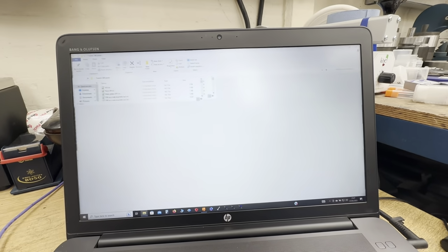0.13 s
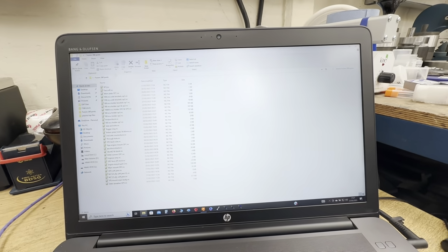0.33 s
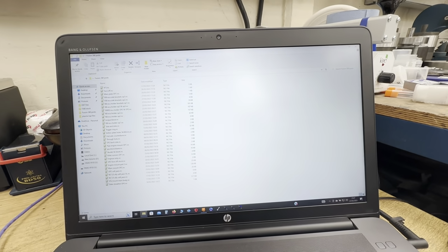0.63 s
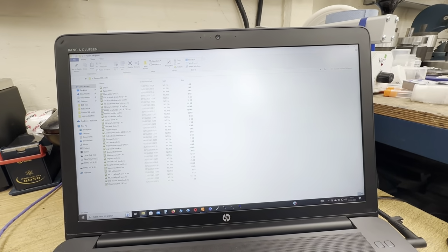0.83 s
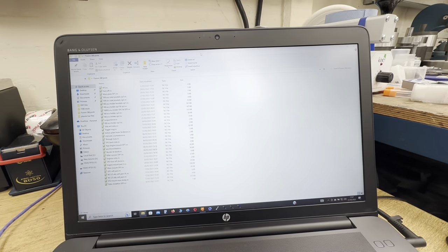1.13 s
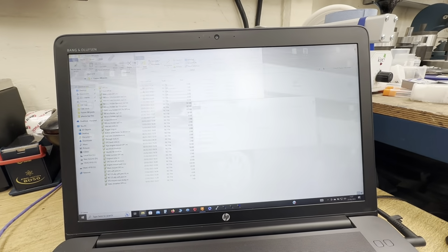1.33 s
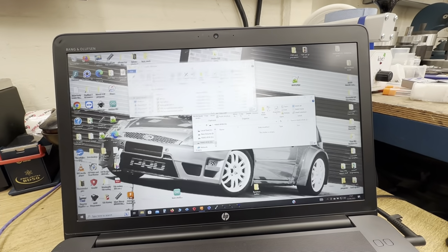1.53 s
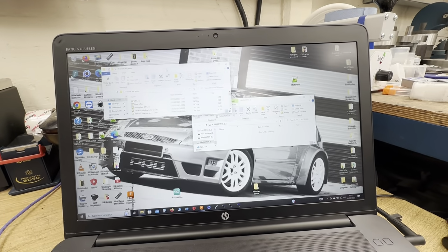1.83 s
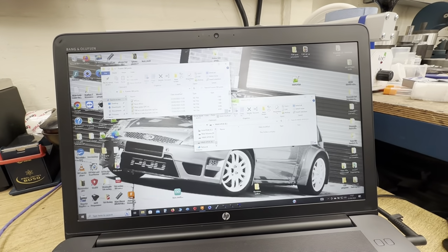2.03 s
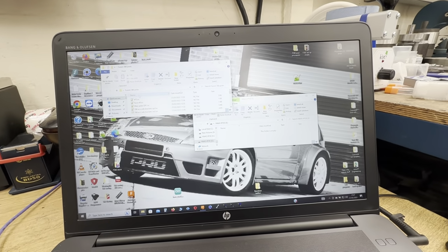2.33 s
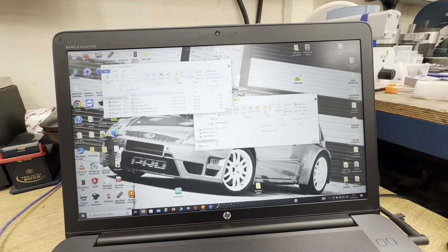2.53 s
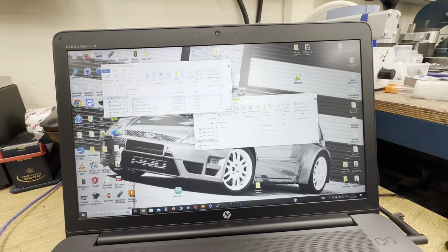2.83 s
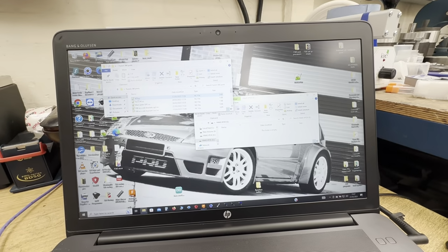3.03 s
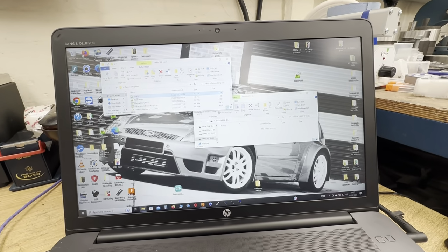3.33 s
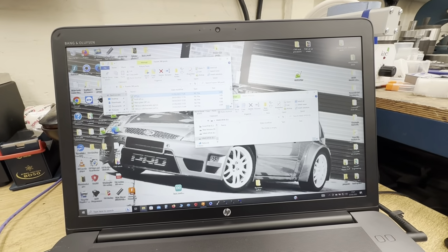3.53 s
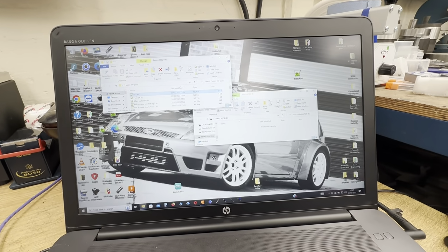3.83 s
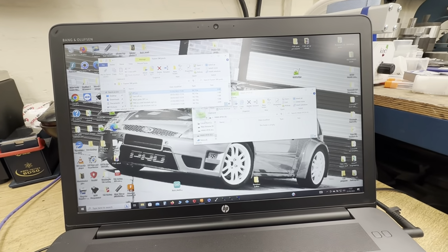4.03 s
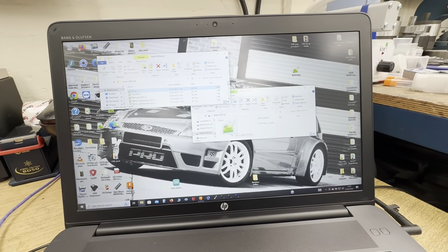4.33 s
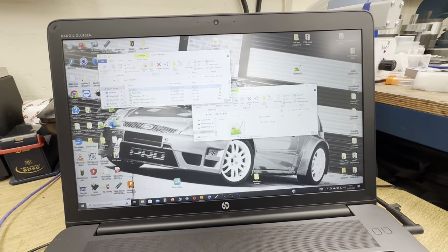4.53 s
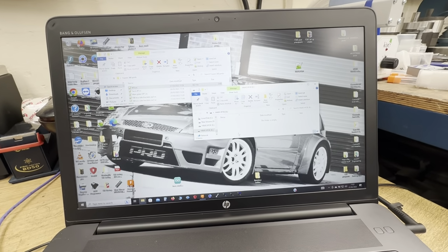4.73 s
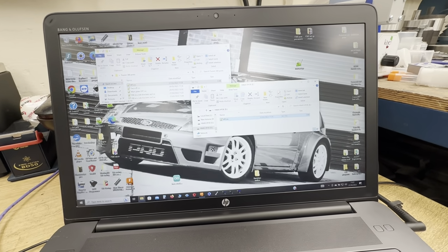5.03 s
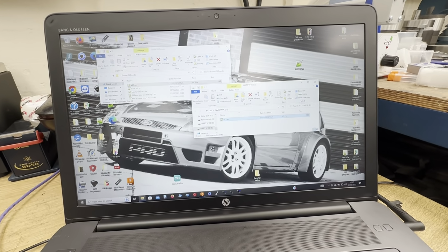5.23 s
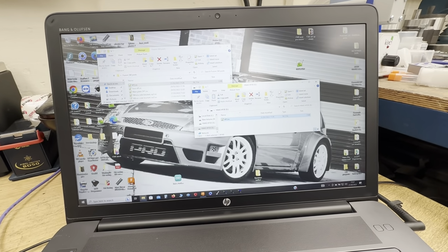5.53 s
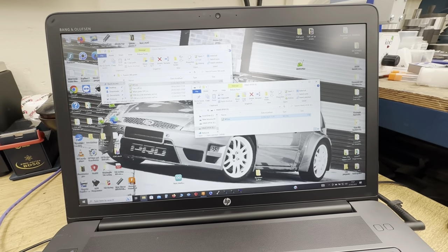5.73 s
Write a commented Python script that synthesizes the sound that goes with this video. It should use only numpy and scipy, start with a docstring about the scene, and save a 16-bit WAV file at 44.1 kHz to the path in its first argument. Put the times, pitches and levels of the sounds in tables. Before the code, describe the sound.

Steady machine drone with low hum, rushing air and a buzzing treble whine, dotted with a few crisp mouse clicks near the right side.

```python
"""Compressor in a workshop

An air compressor runs steadily, mostly to the left: sines for shaft hum, rotor tones and a whine full of
sidebands, a looped buzz for the casing, shaped noise for rumble, rushing air and fizz. A cooling fan and mains
gear add sine drones. A mouse clicks close by on the right, as short rings, snaps and taps. The hand-held
two-port microphone sways by a few centimetres, which bends the steady tones and the buzz."""
import sys
import numpy as np
from scipy import signal
from scipy.fft import rfft, irfft, next_fast_len
from scipy.io import wavfile
from scipy.ndimage import uniform_filter1d, map_coordinates

SR = 44100
rng = np.random.default_rng(int(sys.argv[2]) if len(sys.argv) > 2 else 0)


def int16_out(signal):
    """Quantize to a 16-bit WAV file."""
    q = np.round(np.clip(np.atleast_2d(signal).T, -1, 1) * 32767)
    wavfile.write(sys.argv[1], SR, q.astype(np.int16))


N = 260190
T = np.arange(N) / SR

SHAFT_HZ, ROTOR_HZ, FAN_HZ, MAINS_HZ, WHINE_HZ = 31.515, 105.103, 249.0, 50.0, 3798.18
MONO_HZ = 10300  # above this the casing buzz has one pattern for both ports and the room ripple stops
TOP_HZ = 15850


def amp(db):
    """Gain of a level in dB."""
    return 10 ** (np.asarray(db) / 20)


def along(points, hz, column=1):
    """One column of a table that starts with Hz, read on a log frequency axis."""
    rows = np.array(points)
    return np.interp(np.log(hz + 1), np.log(rows[:, 0] + 1), rows[:, column])


def wobble(rate):
    """A smooth random curve with rate knots a second."""
    knots = rng.standard_normal(int(N * rate / SR) + 4)
    coarse_t = T[::64]
    return np.interp(T, coarse_t, map_coordinates(knots, [coarse_t * rate]))


def filtered(x, response):
    """Shapes x by a complex response of frequency."""
    size = next_fast_len(N + 8192)
    hz = np.fft.rfftfreq(size, 1 / SR)
    return irfft(rfft(x, size) * response(hz), size)[..., :N]


def bump(hz, centre, width):
    """A bell of height 1 on the frequency axis."""
    return np.exp(-((hz - centre) / width) ** 2)


# Microphone sway, as extra travel time of the sound: time_s [s], delay_ms [ms]
SWAY_PATH = [(0.0, -0.15), (1.0, -0.03), (2.9, 0.095), (4.3, -0.01), (4.9, 0.0), (5.9, -0.09)]


def swayed_time():
    """The time at which sound now arriving left its source, so the sway bends pitch slightly."""
    delay_ms = np.interp(T, *np.transpose(SWAY_PATH))
    return T - delay_ms / 1000


def tone(hz, left_db, right_db, left_lag_rad):
    """A sine of chance phase; standing waves give each port its own level and phase."""
    phase = 2 * np.pi * hz * swayed_time() + rng.uniform(0, 2 * np.pi)
    left = amp(left_db) * np.cos(phase)
    right = amp(right_db) * np.cos(phase + left_lag_rad)
    return np.sqrt(2) * np.array([left, right])  # levels are RMS


def tones(rows, waver_db, rate):
    """Sums sines that each waver in level on their own."""
    return sum(amp(waver_db * wobble(rate)) * tone(*row) for row in rows)


def multiples(base_hz, table):
    """Turns a first column of multiples into Hz."""
    return [(k * base_hz, *rest) for k, *rest in table]


# Low shaft hum: multiple [of SHAFT_HZ], left_db [dB], right_db [dB], left_lag_rad [rad], loudest_s [s]
HUM_TONES = [(3, -36.7, -37.7, .2, .7), (4, -37.3, -39.3, .5, 1.3)]


def hum():
    """Low shaft multiples, each slowly waxing and waning in level."""
    swing_db, period_s = 1.1, 2.21
    out = np.zeros((2, N))
    for k, left_db, right_db, left_lag_rad, loudest_s in HUM_TONES:
        swing = amp(swing_db * np.cos(2 * np.pi * (T - loudest_s) / period_s))
        out += swing * tone(k * SHAFT_HZ, left_db, right_db, left_lag_rad)
    return out


# Whine, pulsed by the shaft; the centre tone (overtone 1, sideband 0) is set in whine() instead:
# overtone [of WHINE_HZ], sideband [steps of SHAFT_HZ], left_db [dB], right_db [dB], left_lag_rad [rad]
WHINE_SIDES = [(1, -2, -53, -63, 0.6), (1, -1, -55, -61, 2.0), (1, 0, -52, -46, -0.4),
               (1, 1, -61, -60, 2.4), (1, 2, -60, -59, 2.6), (1, 3, -57, -61, -0.4), (1, 6, -61, -73, 0.6),
               (3, -1, -74, -73, -0.0)]


def whine():
    """A centre tone that grows and spreads to the left, among slowly wavering shaft sidebands."""
    grow_s = 2.5  # time constant

    def grown(start_db, settled_db):
        return settled_db + (start_db - settled_db) * np.exp(-T / grow_s)

    centre = tone(WHINE_HZ, grown(-68, -47), grown(-51, -44.5), -.4)
    sides = [(m * WHINE_HZ + k * SHAFT_HZ, *rest) for m, k, *rest in WHINE_SIDES if k]
    return centre + tones(sides, waver_db=2.0, rate=1.2)


# Rotor tones: multiple [of ROTOR_HZ], left_db [dB], right_db [dB], left_lag_rad [rad]
ROTOR_TONES = [(1, -48, -50, .3), (10, -49, -63, 2.3), (15, -44, -62, 1.5), (20, -47, -58, -1.7),
               (25, -63, -63, -.3)]


def rotor():
    """Multiples of the rotor speed, each swelling and fading by chance."""
    return tones(multiples(ROTOR_HZ, ROTOR_TONES), waver_db=2.3, rate=1.885)


# Strongest high shaft tones: multiple [of SHAFT_HZ], left_db [dB], right_db [dB], left_lag_rad [rad]
SHAFT_TONES = [(116, -58, -70, 3.0), (117, -59, -64, 2.6), (119, -52, -54, 1.3), (120, -41, -65, 1.3),
               (123, -50, -62, -2.5), (239, -54, -62, -0.2), (243, -60, -70, 0.2), (244, -54, -66, 0.6),
               (245, -57, -69, -0.9), (246, -58, -64, -2.5), (247, -61, -62, 0.1), (251, -61, -64, -2.2)]
# Sidebands of the strong tones near the whine:
# carrier_hz [Hz], sideband [steps of FAN_HZ], left_db [dB], right_db [dB], left_lag_rad [rad]
BLADE_SIDEBANDS = [(119 * SHAFT_HZ, 1, -59, -71, 1.0), (120 * SHAFT_HZ, -1, -58, -70, .2),
                   (120 * SHAFT_HZ, 1, -59, -74, -.4), (WHINE_HZ, -1, -57, -62, .7),
                   (WHINE_HZ, 1, -55, -62, -.1), (WHINE_HZ, 2, -62, -67, 1.0)]
# Single thin tones: pitch_hz [Hz], left_db [dB], right_db [dB], left_lag_rad [rad]
THIN_TONES = [(303.0, -55, -58, .5), (585.4, -60, -72, -2.0), (606.3, -62, -58, 2.3),
              (4304.6, -61, -80, .2), (4399.5, -61, -70, -1.8)]


def steady_tones():
    """High shaft multiples, sidebands a blade rate apart and thin single tones, nearly level."""
    sidebands = [(hz + k * FAN_HZ, *rest) for hz, k, *rest in BLADE_SIDEBANDS]
    rows = multiples(SHAFT_HZ, SHAFT_TONES) + sidebands + THIN_TONES
    return tones(rows, waver_db=0.4, rate=2.65)


# Bands where the casing rings: centre_hz [Hz], width_hz [Hz], left_db [dB per tone], right_db [dB per tone]
CASING_BANDS = [(3830, 500, -65.5, -64.5), (7580, 710, -63, -65), (11320, 330, -76, -76)]


def casing_buzz():
    """Every shaft turn repeats one small rattle: faint multiples at chance levels in the casing's bands."""
    hz = np.arange(2049) * SHAFT_HZ
    gain = sum(amp([[left_db], [right_db]]) * bump(hz, centre, width)
               for centre, width, left_db, right_db in CASING_BANDS)
    gain[:, [int(row[0]) for row in SHAFT_TONES]] = 0  # these play as steady tones
    rattle = rfft(rng.standard_normal((2, 4096)))
    rattle[1] = np.where(hz > MONO_HZ, rattle[0], rattle[1])
    one_turn = irfft(rattle * gain) * np.sqrt(2048)
    place = swayed_time() * SHAFT_HZ * 4096
    return np.array([map_coordinates(port, [place], mode="grid-wrap") for port in one_turn])


# Fan tones: multiple [of FAN_HZ, the blade rate], left_db [dB], right_db [dB], left_lag_rad [rad]
FAN_TONES = [(1, -48, -44, .9), (2, -52, -51, 2.5), (3, -58, -60, -1.5), (5, -64, -63, .3)]


def fan():
    """The cooling fan's blade rate and its multiples."""
    return tones(multiples(FAN_HZ, FAN_TONES), waver_db=0.2, rate=1.3)


# Mains tones: multiple [of MAINS_HZ], left_db [dB], right_db [dB], left_lag_rad [rad]
MAINS_TONES = [(1, -47, -49, .1), (2, -51, -52, .1), (6, -54, -58, -.2)]


def mains_gear():
    """Hum at multiples of the mains frequency."""
    return tones(multiples(MAINS_HZ, MAINS_TONES), waver_db=0.2, rate=1.3)


def patchy(depth_db):
    """Two white noises of 0 dB per Hz that share time-frequency patches of random gain."""
    spectra = signal.stft(rng.standard_normal((2, N)), nperseg=512)[2]
    field = rng.standard_normal(spectra.shape[1:])
    field = uniform_filter1d(field, size=5, axis=0)  # across frequency
    field = uniform_filter1d(field, size=8, axis=1)  # across time
    patches = amp(depth_db * field / field.std())
    pair = signal.istft(spectra * patches, nperseg=512)[1][:, :N]
    return pair / pair.std() * np.sqrt(SR / 2)


# Likeness of the noise at both ports: pitch_hz [Hz], likeness [0 to 1]
LIKENESS = [(60, .99), (150, 0.99), (250, 0.96), (350, 0.14), (500, 0.45), (750, 0.065), (1000, 0.33),
            (2200, 0.29), (4000, 0.24), (10000, 0.25)]
# Phase lag of the shared noise at the left port: pitch_hz [Hz], left_lag_rad [rad]
LEFT_LAG = [(60, .15), (300, 0.8), (400, 1.8), (500, 1.73), (650, 3.6), (800, 1), (1300, 1.9), (1700, 3.33),
            (2500, 4.96), (3500, 6.5), (10000, 24)]


def rush(table, patchy_db):
    """Stereo noise: a part shared by both ports, later at the left, and a part of the left's own."""
    def response(hz):
        alike = np.clip(along(LIKENESS, hz), 0, 1)
        late = np.exp(-1j * along(LEFT_LAG, hz))
        band = hz < table[-1][0]
        left = amp(along(table, hz, column=1)) * band
        right = amp(along(table, hz, column=2)) * band
        return np.array([[left * late * alike, left * np.sqrt(1 - alike ** 2)],
                         [right, 0 * right]])
    return filtered(patchy(patchy_db), response).sum(axis=1)


# Room rumble before room colour: pitch_hz [Hz], left_db [dB per Hz], right_db [dB per Hz]
RUMBLE_NOISE = [(20, -93, -96), (42, -81, -81), (63, -62, -60), (85.5, -67, -68), (106, -64, -65),
                (135, -65.5, -68), (167, -63, -64), (197, -69.5, -66), (248, -63, -65.5), (302, -70.5, -69),
                (480, -72.5, -72.5), (630, -75, -77), (850, -75.5, -74), (1270, -100, -100)]


def rumble():
    """Low broad noise that swells briefly once."""
    surge_s, surge_width_s, surge_db = 1.39, 0.069, 2.5
    surge = amp(surge_db * np.exp(-((T - surge_s) / surge_width_s) ** 2))
    return surge * rush(RUMBLE_NOISE, patchy_db=1.34)


# Rushing air before room colour: pitch_hz [Hz], left_db [dB per Hz], right_db [dB per Hz]
AIR_NOISE = [(493, -100, -100), (1000, -78, -77.5), (1634, -68.5, -75), (2240, -72.5, -78.5),
             (3180, -78, -83), (3930, -75.5, -85), (4420, -76, -84), (5940, -80, -91.5), (7400, -83, -81.5),
             (7850, -79, -85.5), (8600, -82.5, -79), (9440, -92, -82), (10160, -95, -88)]


def rushing_air():
    """Broad hiss of moving air, faintly patchy."""
    return rush(AIR_NOISE, patchy_db=0.94)


# Fizz before room colour: pitch_hz [Hz], level_db [dB per Hz]
FIZZ_NOISE = [(9800, -120), (10300, -93), (10800, -96), (11400, -92), (11800, -100), (12500, -101),
              (13000, -110), (14200, -100), (15600, -113)]
# Part of the fizz that differs between the ports: pitch_hz [Hz], size [ratio to the shared part]
FIZZ_SIDE = [(13000, 0.044), (14000, .7), (15600, 1.5)]


def fizz():
    """The faint, flickering top of the hiss, with opposite side parts at the two ports."""
    def response(hz):
        apart = np.clip(along(FIZZ_SIDE, hz), 0, 3)
        shared = amp(along(FIZZ_NOISE, hz)) / np.sqrt(1 + apart ** 2)
        return np.array([shared, shared * apart])
    mid, side = filtered(patchy(depth_db=2.5), response)
    return np.array([mid + side, mid - side])


# Humps and dips that room and microphone lay on the noise: centre_hz [Hz], width_hz [Hz], level_db [dB]
ROOM_COLOUR = [(147.3, 5, 3.5), (170, 5.4, 3), (190.4, 8.9, -8.5), (429, 21, 5), (577, 8, -3.5),
               (719, 57, 4.5), (900, 50, -1.5), (994, 71, 4), (1313, 25, 4.5), (6090, 63, 4.5),
               (7460, 120, -7), (7780, 170, 5)]
# Narrow treble dips: centre_hz [Hz], width_hz [Hz], level_db [dB]
TREBLE_DIPS = [(5190, 110, -8), (9480, 110, -5), (10090, 60, -7)]


def room(x, ripple_db, step_hz):
    """Fixed humps and dips, and the fine chance ripple of many echoes, different at each port."""
    knots = rng.standard_normal((2, 4000))

    def response(hz):
        humps = sum(db * bump(hz, centre, width) for centre, width, db in ROOM_COLOUR + TREBLE_DIPS)
        ripple = np.array([map_coordinates(port, [hz / step_hz], mode="wrap") for port in knots])
        fade_in = np.clip(hz / 600, 0, 1)
        # the ripple stops at MONO_HZ; the humps and dips reach above it
        return amp(humps + ripple_db * ripple * fade_in * (hz < MONO_HZ))
    return filtered(x, response)


# Mouse presses: start_s [s], ring_db [peak dB at the right port], ring_hz [Hz],
# snap_db [dB gain on the shell modes], tap_db [dB gain on the tap noise]
PRESSES = [(1.219, -28, 9200, -41, -33), (1.8406, -29, 9150, -39, -36), (1.8896, -40.5, 9400, -48, -38),
           (2.927, -24, 9240, -45, -36), (3.011, -23.5, 9100, -41, -36), (3.6295, -24, 9060, -42, -37),
           (4.0133, -33.5, 9200, -48, -26), (4.5874, -32.5, 9500, -40, -34)]
# Modes of the mouse shell: pitch_hz [Hz], level_db [dB, before a chance offset per press]
SHELL_MODES = [(10300, 4), (11200, -2), (12600, -7), (13900, 4), (14900, -6)]


def shell_snap(t):
    """The shell's modes as sines, with chance levels and a slightly different phase at each port."""
    out = 0
    for hz, level_db in SHELL_MODES:
        level = amp(level_db + rng.normal(0, 2))
        cycles = hz * t + rng.uniform() + 0.12 * rng.standard_normal((2, 1))
        out = out + level * np.sin(2 * np.pi * cycles)
    return out


def mouse():
    """Each press: the switch blade rings for milliseconds, the shell snaps, the bench gives a dull tap."""
    ring_left_db = -23  # the ring at the left port, against the right
    out = np.zeros((2, N))
    t = np.arange(SR // 50) / SR

    def swell(peak_s):
        return (t / peak_s * np.exp(1 - t / peak_s)) ** 4

    sharp = np.roll(swell(.0009), SR // 800)  # snap peaks about 2 ms into the press
    snap_swell = sharp + .17 * np.roll(sharp, SR // 250)  # echo off the bench, 4 ms later
    dull = signal.butter(4, [1500, 6500], "bandpass", fs=SR)
    for start_s, ring_db, ring_hz, snap_db, tap_db in PRESSES:
        jitter = 0.16 * np.cumsum(rng.standard_normal(len(t)))  # roughens the ring
        ring = swell(0.0033) * np.sin(2 * np.pi * ring_hz * t + jitter)
        snap = snap_swell * shell_snap(t)
        tap = swell(0.0032) * signal.lfilter(*dull, rng.standard_normal((2, len(t))))
        press = amp([[ring_db + ring_left_db], [ring_db]]) * ring
        press += amp(snap_db) * snap + amp(tap_db) * tap
        start = round(start_s * SR)
        out[:, start:start + len(t)] += press
    return out


def scene():
    """Compressor, fan, mains gear, noise coloured by the room, and the mouse."""
    compressor = hum() + whine() + rotor() + steady_tones() + casing_buzz()
    drone = fan() + mains_gear()
    noise = room(rumble() + rushing_air() + fizz(), ripple_db=1.5, step_hz=25.17)
    return compressor + drone + noise + mouse()


def record(dry):
    """Band limit: nothing passes from TOP_HZ upward."""
    return filtered(dry, lambda hz: hz < TOP_HZ)


dry = scene()
out = record(dry)
int16_out(out)
```